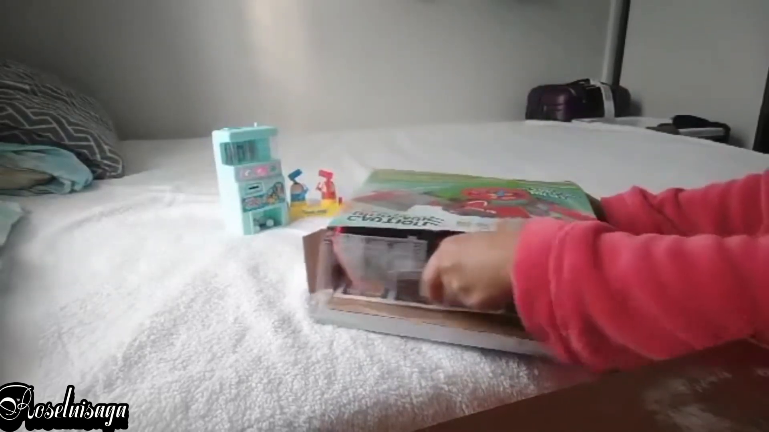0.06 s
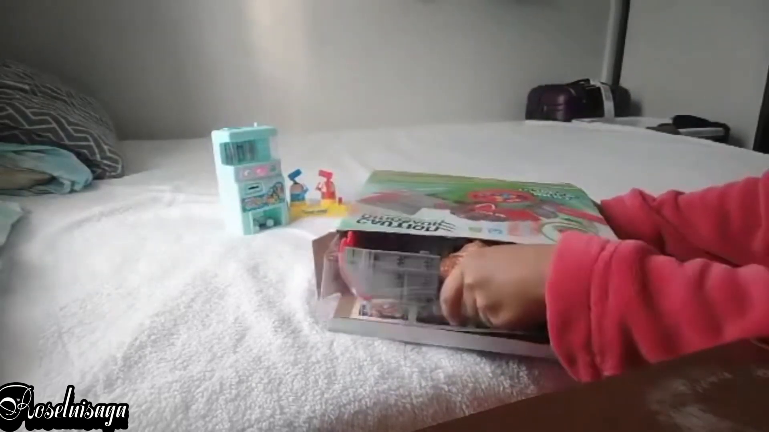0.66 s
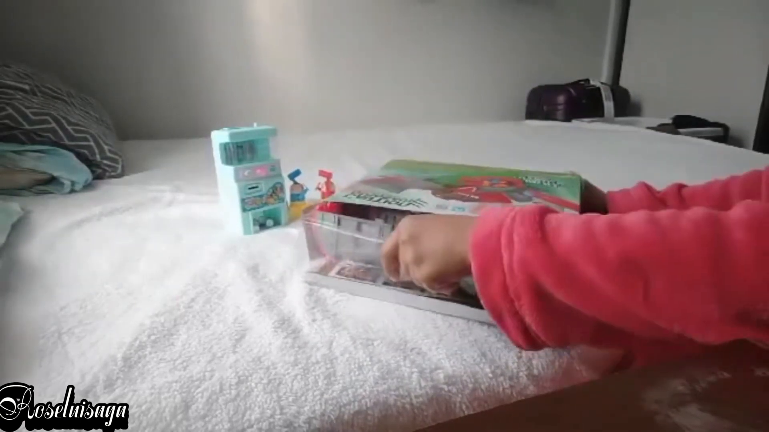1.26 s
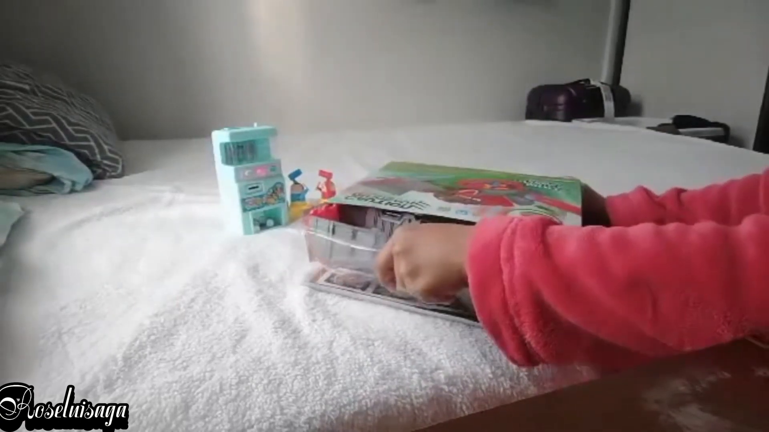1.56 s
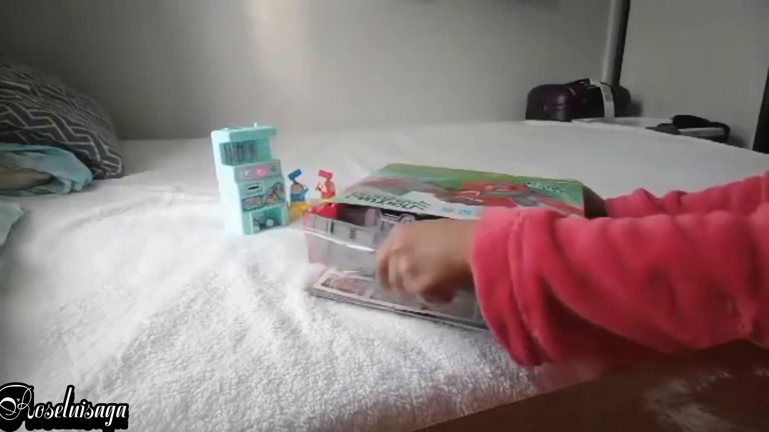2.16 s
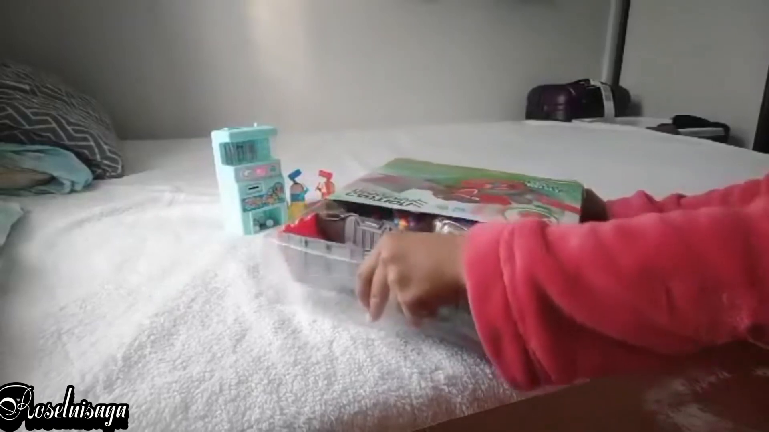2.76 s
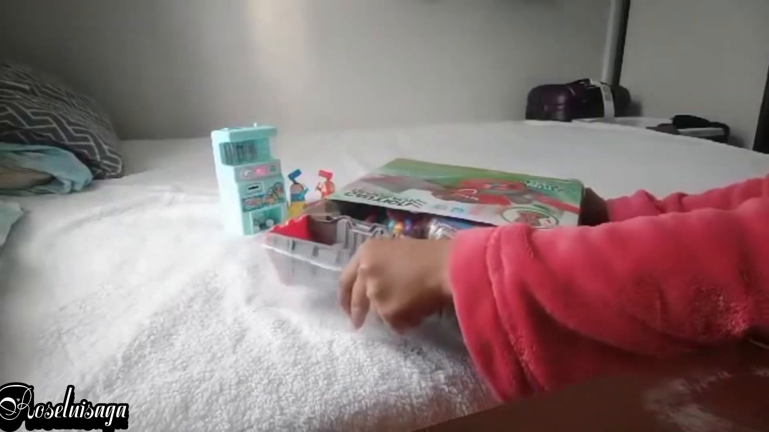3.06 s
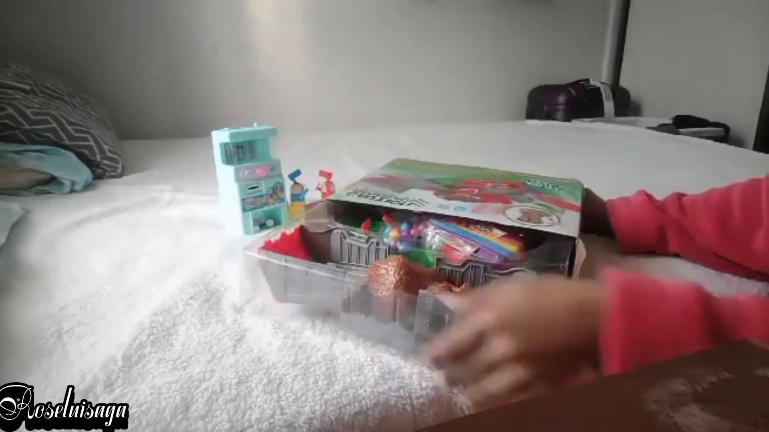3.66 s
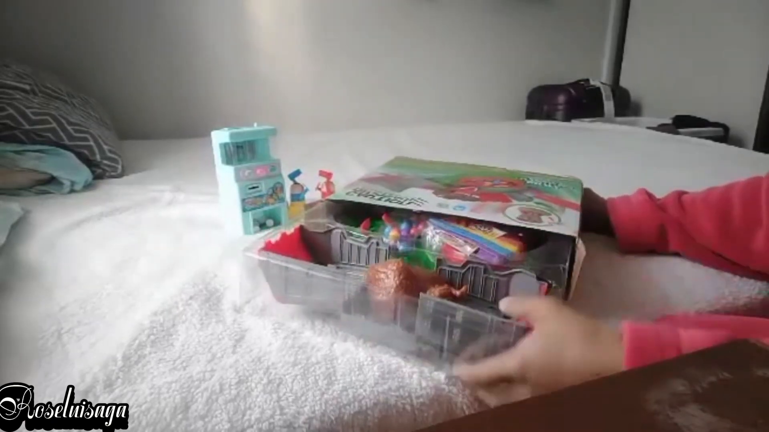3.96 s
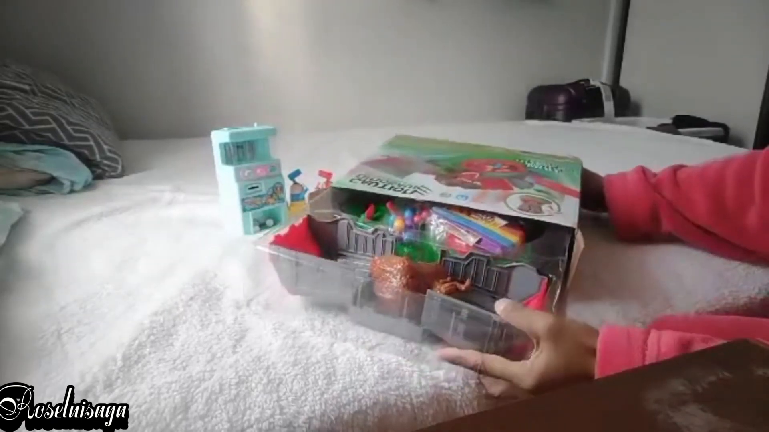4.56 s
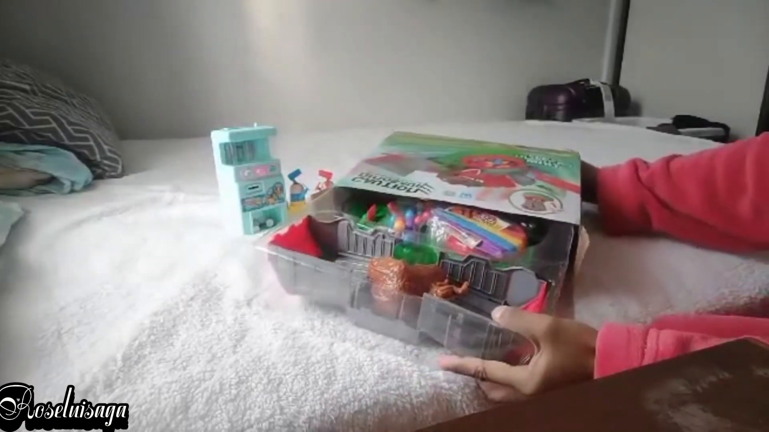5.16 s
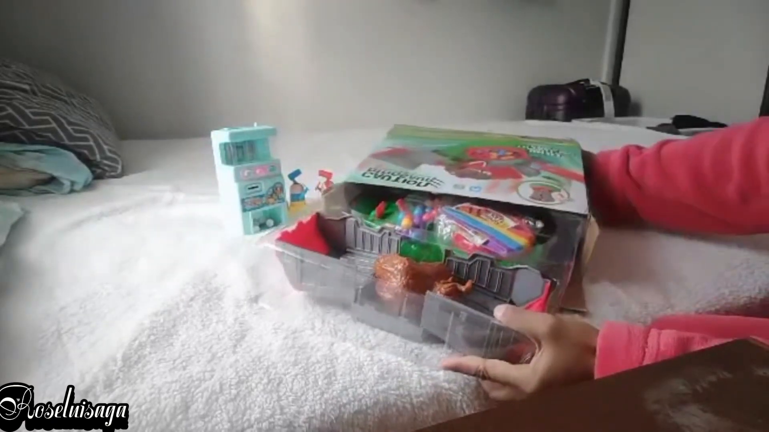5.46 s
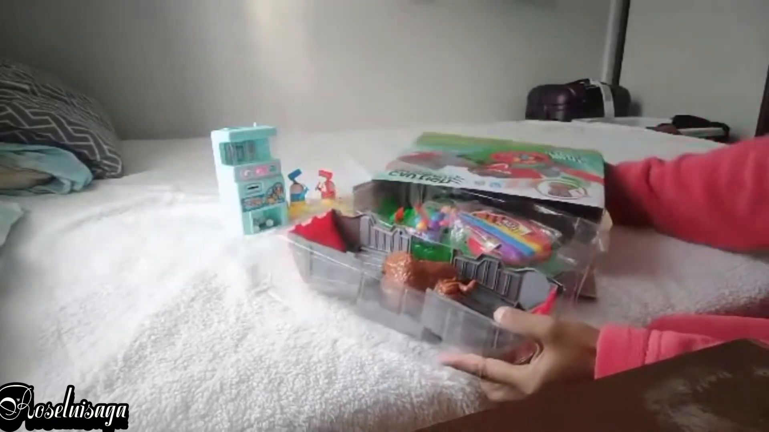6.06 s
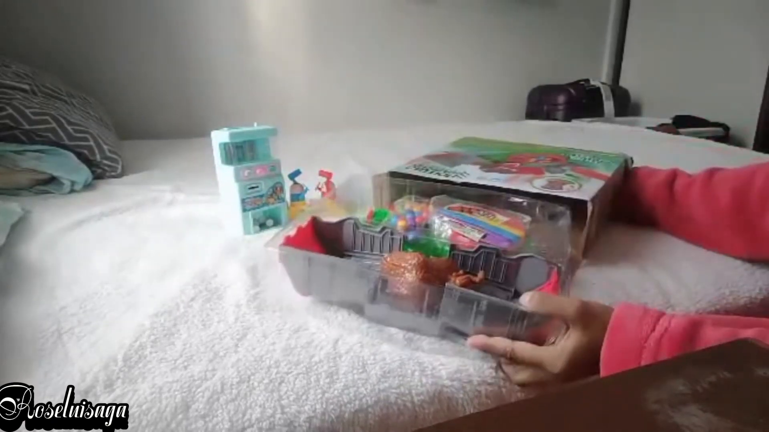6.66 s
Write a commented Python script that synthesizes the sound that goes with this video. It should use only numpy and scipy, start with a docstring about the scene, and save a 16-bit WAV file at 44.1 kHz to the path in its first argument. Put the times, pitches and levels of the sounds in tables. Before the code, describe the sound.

A plastic tray of toys scrapes out of a cardboard box, with thin plastic snapping, crackling and knocking in a small room.

```python
"""A crisp snap of thin plastic, then scraping: a tray of small toys is tugged out of a cardboard box.
The box lies on a bed in a small furnished room, close to a stereo pair of microphones.
The tray sticks and slips in short strokes, its walls buckle, flaps knock and the box bumps the mattress.
Each contact sounds in three registers: the hollow of the box, its panels and the crisp plastic edges."""
import sys
import numpy as np
from scipy import signal
from scipy.fft import rfft, irfft
from scipy.io import wavfile
from scipy.ndimage import uniform_filter1d

SR = 44100
rng = np.random.default_rng(int(sys.argv[2]) if len(sys.argv) > 2 else 0)


def wrap_up_sound(samples):
    """Save the sound to the file named by the first command line argument, as 16-bit audio."""
    columns = np.atleast_2d(samples).T
    # keep every value between -1 and 1, then stretch to whole-number steps
    tamed = np.clip(columns, -1, 1)
    steps = np.round(tamed * 32767).astype(np.int16)
    wavfile.write(sys.argv[1], SR, steps)


N = 304290
TAPS = 2048  # samples in the sound of one contact
FREQS = np.fft.rfftfreq(TAPS, 1 / SR)
PLAIN_WALL_HZ = 3200  # a wall of this pitch ticks neither bright nor dull

# tone colour of the box's hollow, its panels and the plastic edges: frequency_hz, level_db
HOLLOW_COLOUR = [(20, -31.5), (55, -18.5), (85, -16.5), (125, -9), (175, -1), (230, 4), (320, 2.5),
                 (450, -0.5), (620, -15), (1500, -47.5)]
PANEL_COLOUR = [(120, -35.5), (300, -26.5), (480, -0.5), (800, 3.5), (1100, 2), (1500, -4.5), (2200, -4),
                (4000, -10), (9000, -75.5)]
EDGE_COLOUR = [(500, -54), (1100, 2.5), (1700, 2), (2400, 1.5), (3300, 1.5), (4200, -2), (5000, -3),
               (6200, -2.5), (7200, -8.5), (7700, -18.5), (8300, -25.5), (10000, -18), (11500, -26),
               (12700, -31.5), (13500, -46.5)]


def amp(db):
    """Decibels to gain."""
    return 10 ** (np.asarray(db) / 20)


def curve_at(points, hz):
    """Reads a table on a log-frequency axis."""
    f, value = np.transpose(points)
    return np.interp(np.log(hz + 1), np.log(f + 1), value)


def unit(x):
    """Scales a sound to a mean energy of 1 per channel."""
    return x / np.sqrt(np.mean(np.sum(x ** 2, axis=-1)) + 1e-20)


def add(mix, start_s, sound):
    """Mixes a stereo sound in at start_s."""
    part = mix[:, max(round(start_s * SR), 0):][:, :sound.shape[1]]
    part += sound[:, :part.shape[1]]


def lumps(length, size):
    """Random swells of unit spread, each about size samples long."""
    x = uniform_filter1d(uniform_filter1d(rng.standard_normal(length), size), size)
    return x / x.std()


def resonance(hz, width_hz):
    """Shape of one resonance, 1 at its centre."""
    return 1 / (1 + (2 * (FREQS - hz) / width_hz) ** 2)


def minimum_phase(db):
    """The shortest impulse response with this spectrum."""
    log_gain = np.log(amp(np.maximum(db, db.max() - 80)))
    mirrored = np.r_[log_gain, log_gain[-2:0:-1]]
    return np.fft.ifft(np.exp(np.conj(signal.hilbert(mirrored)))).real


def pair_noise(length):
    """Noise as two closely spaced microphones hear it: alike in the bass, unrelated in the treble."""
    # likeness of the two microphones: frequency_hz, correlation
    likeness = [(100, 0.77), (300, 1), (600, 0.85), (1300, 0.54), (2800, 0.032), (13000, 0)]
    a, b = rfft(rng.standard_normal((2, length)))
    same = np.clip(curve_at(likeness, np.fft.rfftfreq(length, 1 / SR)), -1, 1)
    return irfft([a, same * a + np.sqrt(1 - same ** 2) * b], length)


def left_lag(time_s):
    """Whole samples by which the left microphone hears the contact later."""
    # path of the contact in front of the pair: time_s, lag_samples
    path = [(0, -0.5), (3.3, -5.5), (3.7, 3.5), (4.7, 5), (6.2, 5.5), (6.9, 2.5)]
    return np.round(np.interp(time_s, *np.transpose(path))).astype(int)


def contact(register, ring_hz, ring_db, ring_width_hz, flutter_s, flutter_db,
            tilt_db=0, ripple_db=2.5, rise_s=.0002, fizz_db=0, evenness=0):
    """A sharp push, then a crackling flutter of the sheet, coloured by the box and the part that rings."""
    # resonances of the box: pitch_hz, width_hz, lift_db
    box_modes = [(120, 34, -3), (215, 34, 2), (354.6, 45, 7), (453, 29, 2), (570, 27, 2), (926, 13, 2),
                 (1040, 17, 0), (1326, 26, 1)]
    t = np.arange(TAPS) / SR
    flutter = (1 - np.exp(-t / rise_s)) * np.exp(-(t / flutter_s) ** 0.95)
    flutter *= amp(1.5 * lumps(TAPS, size=50))  # crackle
    blow = amp(flutter_db) * unit(pair_noise(TAPS) * flutter)
    blow[:, 0] += 1  # the push
    colour_db = curve_at(register, FREQS) + sum(db * resonance(hz, width) for hz, width, db in box_modes)
    colour_db += tilt_db * np.log2(FREQS.clip(1500, 8000))  # a harder, shorter blow is brighter
    colour_db += fizz_db * np.clip(FREQS / 10160 - 1, 0, .5) * 2  # top octave only
    drive = uniform_filter1d((abs(rfft(blow)) ** 2).mean(0), size=27)
    colour_db -= evenness * 10 * np.log10(drive + 1e-9)  # an even blow leaves the colour to the modes
    walls_hz = np.linspace(1200, 13500, 22)  # each spot favours other wall modes
    colour_db += np.interp(FREQS, walls_hz, ripple_db * rng.standard_normal(len(walls_hz)), left=0)
    modes = resonance(ring_hz, ring_width_hz) + .3 * resonance(1.3 * ring_hz, ring_width_hz)
    body = minimum_phase(colour_db + ring_db * modes)
    return unit(irfft(rfft(blow, 2 * TAPS) * rfft(body, 2 * TAPS)))


def strike(start_s, hollow_db, panels_db, edges_db, ring_hz, ring_db, tilt_db, flap_hz, crumple_s, rise_s):
    """One blow in all three registers: a flap and a wall ring, and heavier parts shake for longer."""
    blow = dict(tilt_db=tilt_db, ripple_db=1.0, rise_s=rise_s, evenness=0.71)
    flap = dict(ring_hz=flap_hz, ring_db=8, ring_width_hz=180, **blow)
    wall = dict(ring_hz=ring_hz, ring_db=ring_db, ring_width_hz=.27 * ring_hz, **blow)  # well damped
    crack_db = 2 / (1 + crumple_s / 0.004)  # a clean click has the most fizz
    hollow = amp(hollow_db) * contact(HOLLOW_COLOUR, flutter_s=crumple_s + 0.0045, flutter_db=1.5, **flap)
    panels = amp(panels_db) * contact(PANEL_COLOUR, flutter_s=crumple_s + 0.0031, flutter_db=15, **flap)
    edges = amp(edges_db) * contact(EDGE_COLOUR, flutter_s=crumple_s, flutter_db=7, fizz_db=crack_db, **wall)
    left, right = np.sqrt(SR / 100) * (hollow + panels + edges)  # levels hold for energy spread over 10 ms
    lag = left_lag(start_s)
    return np.array([np.roll(left, max(lag, 0)), np.roll(right, max(-lag, 0))])


def plastic_pops(rows):
    """Stiff plastic gives way fast and shakes the box: a short crumple clicks, a long one crunches."""
    out = np.zeros((2, N))
    for start_s, edges_db, box_db, ring_hz, ring_db, tilt_db, flap_hz, crumple_s in rows:
        panels_db = edges_db + box_db
        add(out, start_s, strike(start_s, panels_db - 9, panels_db, edges_db,
                                 ring_hz, ring_db, tilt_db, flap_hz, crumple_s, rise_s=0.0005))
    return out


def wall_snaps():
    """The thin walls of the tray buckle and snap."""
    # buckling walls, box_db relative to level_db:
    # start_s, level_db, box_db, ring_hz, ring_db, tilt_db_per_octave, flap_hz, crumple_s
    buckles = [(.002, -29.5, 1, 5900, -2, 7, 1030, 0.014), (.016, -33.5, -5, 4850, -8, -1, 1030, 0.0061),
               (.0567, -38, -6, 3560, 7, -7, 830, .002), (.2234, -46.5, 4.5, 3430, 14, 1, 910, .0027),
               (.336, -30, -2, 4000, 16, 0.5, 790, .0066), (.4014, -30, -4, 5170, 0.5, .5, 1430, 0.014),
               (.5253, -49, -3, 3400, 1, 0, 890, .002), (.6295, -27, -0.5, 1830, 9, -2.5, 1540, .0068),
               (.7866, -26.5, -5, 2870, 6, -3, 694, 0.0096), (.874, -37.5, 1.5, 3330, -4, 6, 840, .0034),
               (.9205, -30, -4.5, 6000, 3, 0.5, 734, 0.0094), (.9403, -31, -5, 4680, -3, 1.5, 1280, 0.0058),
               (.9605, -27.5, -9, 3400, 2.5, 2, 850, 0.011), (.976, -38, 0, 4600, 6, -2, 900, .0027),
               (1.0253, -31, -5, 3780, -4, 2.5, 1060, .004),
               (1.1886, -28.5, -3, 3570, 2, -3.5, 1030, 0.006), (1.2411, -40, -10, 3440, 4, 4, 900, 0.0018),
               (1.511, -39, 2, 5500, -8, 5, 900, .003), (1.626, -22, -5, 3740, 0, -1, 1060, .013),
               (1.645, -29.5, -7, 3230, -7, -2.5, 850, 0.007),
               (1.663, -30, -4, 5700, -1, 5.5, 1050, 0.0038), (1.7156, -38, -11, 3300, -9, 2, 900, 0.0039),
               (1.7353, -30.5, -6.5, 1600, 12, -9, 1500, 0.0031),
               (1.8202, -37, 0, 4400, 6, -0.5, 1040, 0.001), (1.85, -27, -6.5, 4000, 6, 0, 1030, 0.004),
               (1.983, -35.5, 4.5, 3300, 5, -4, 1050, 0.017), (2.0105, -24.5, -11, 2620, 8, -2, 1030, 0.02),
               (2.075, -40, 5, 3750, 1, -7, 960, .009), (2.21, -42, -8, 3200, -5, 4, 900, .005),
               (2.229, -31, -9, 2580, 1, -1, 1030, 0.0079), (2.3537, -37, -14, 3000, 7, -3, 900, 0.0036),
               (2.4005, -23, -3.5, 4750, 2, -2, 915, 0.0029), (2.438, -25, -4, 3380, 5, 4.5, 810, 0.013),
               (2.513, -25, -2.5, 3070, 6, -7.5, 1160, 0.0068), (2.5507, -25, -11, 3250, 0, 2.5, 740, .02),
               (2.64, -37, -16, 3700, -1, -0.5, 900, 0.0015),
               (2.707, -38.5, -1.5, 2850, 2, -5.5, 1370, .001), (2.7453, -41.5, -5, 4200, 3, -2, 900, .004),
               (2.768, -35, -12, 1980, 12, 1, 1010, 0.0024),
               (2.8585, -32, -1.5, 3300, -4, -3.5, 1130, .0025),
               (3.0578, -48.5, -2.5, 3020, 4, -1.5, 900, 0.004),
               (3.1105, -45.5, -11.5, 3080, 11, 3, 900, 0.00066),
               (3.1478, -36.5, -17, 5700, 5, 3, 980, 0.0021), (3.179, -31.5, -16, 5760, 2, 1, 1200, .003),
               (3.2101, -29, -8, 2340, 4, -3, 1010, 0.0036),
               (3.229, -29.5, -2.5, 3090, 10, -3, 714, 0.0029),
               (3.2626, -32, 0.5, 2600, 0, -3, 1010, 0.0013),
               (3.3113, -32.5, -27, 3860, 11, 6, 925, 0.0037),
               (3.3225, -35, -12, 5380, 2.5, 7, 1100, 0.0039),
               (3.645, -31.5, -5.5, 2540, 10, 0, 1215, 0.0014),
               (3.8181, -43.5, -3.5, 3680, 11, 6, 670, .0013), (3.8685, -45, -13, 4500, 5, 3, 900, .0018),
               (3.877, -29, -16, 3160, 10, 3, 1500, 0.0023), (3.901, -39.5, -21, 4630, 16, 0, 900, 0.0068),
               (4.2573, -51, -13, 5570, -6, 9, 900, 0.0016), (4.269, -55, -16, 6500, 6, 9, 900, .002),
               (4.297, -37, -3, 3180, 11.5, -2, 1150, 0.0015), (4.4694, -43, -1.5, 3710, 7, 0, 725, 0.0035),
               (4.6888, -51, -1, 3500, 11, 1, 900, .003), (4.7276, -38.5, -1, 4270, 11, -2, 805, .0017),
               (4.778, -43, 4, 3350, 2, 4.5, 810, 0.0019), (4.9039, -41.5, -6.5, 3930, 2, -2, 700, 0.0041),
               (4.9843, -37.5, -2.5, 3140, 12, -3.5, 1010, .003),
               (5.0104, -24.5, -0.5, 4060, 7, 2, 890, .003), (5.138, -40.5, -1, 3740, 5, -2, 1160, 0.0018),
               (5.3319, -39.5, -3, 3400, 8, -5, 900, .003),
               (5.424, -33.5, -0.5, 5270, 11, 5.5, 660, 0.0029),
               (5.431, -34.5, -15, 3330, 4, 3, 900, .0034), (5.5115, -45, -3, 3500, -2, 7, 900, .003),
               (5.5484, -40, -6, 3550, 18, 2, 730, .002), (5.5886, -23, -10, 3800, 10, -0.5, 850, 0.0026),
               (5.8131, -36.5, -9, 2190, 11, -2.5, 1260, .0013), (5.8525, -38, -9, 5290, 4, 5, 830, .003),
               (5.923, -33.5, -8, 3860, 8, 1, 1210, .0029), (6.1166, -32.5, -4, 3860, 11, 1, 1150, 0.0037),
               (6.2089, -45, 1, 3300, 2, -1, 900, .003), (6.2878, -29.5, -10.5, 4950, 3, 1, 1195, .0042),
               (6.371, -41.5, -18, 2860, 2, -1, 900, 0.0078),
               (6.4784, -43, -13.5, 5660, 11.5, 6, 944, 0.0011),
               (6.757, -70.5, -10.5, 6600, 7.5, 7.5, 907, 0.0033)]
    return plastic_pops(buckles)


def stroke_levels(grip_db_per_s=413, run_out_db_per_s=313.5, arch_db=1.5):
    """Hollow, panel and edge levels in dB: strokes gather speed, arch and run out; the strongest leads."""
    # pulls and pushes of the tray, hollow_db and edges_db relative to the panels' level_db:
    # start_s, length_s, level_db, swell_db, hollow_db, edges_db
    strokes = [(0.04, 0.087, -41.5, -4, -5.5, -5), (0.16, 0.058, -54.5, 7, -3, -1),
               (0.223, 0.074, -41.5, 5, 0.5, -10), (0.304, 0.045, -32.5, -9, 1.5, -1),
               (0.348, 0.053, -38, -3, -5, -5), (0.512, 0.17, -39.5, 0.5, -6, -7.5),
               (0.789, 0.027, -29.5, -0.5, -14.5, 2.5), (0.929, 0.14, -41, -5, -10.5, -0.5),
               (1.057, 0.23, -44, 7, -5.5, -18), (1.197, 0.098, -37, 10.5, -4, 3.5),
               (1.38, 0.083, -52, -3, -5, -3.5), (1.495, 0.045, -34.5, 9.5, -1, 3),
               (1.62, 0.18, -41, -7, -3, 5.5), (1.761, 0.36, -36.5, 6, -5.5, -9.5),
               (1.992, 0.11, -34.5, 0.5, -8, 2), (2.202, 0.091, -33.5, -3, -5, -7.5),
               (2.36, 0.06, -33, 0.5, -3, 1.5), (2.432, 0.14, -30.5, -2, -6, 0.5),
               (2.589, 0.054, -44, 4, -7, 4), (2.687, 0.03, -44.5, 0, -1.5, 0),
               (2.754, 0.073, -39, -2.5, -4.5, -0.5), (2.858, 0.11, -41, -3.5, -4.5, -1.5),
               (3.098, 0.042, -43.5, -3, -6.5, -6.5), (3.171, 0.046, -35, 0.5, -6, 4.5),
               (3.493, 0.11, -81, -0.5, 1.5, 6), (3.598, 0.031, -58, 0, -2, -5),
               (3.727, 0.098, -53.5, 4, -3.5, 2), (3.893, 0.021, -47.5, 0, -8, -2),
               (3.988, 0.094, -49.5, -13, -2.5, 2), (4.099, 0.047, -52.5, 0, -3, 1),
               (4.175, 0.26, -55.5, -6.5, -9, -4.5), (4.3, 0.33, -53, -1, 0, -1.5),
               (4.487, 0.066, -46, 9.5, -2.5, -3), (4.693, 0.33, -57.5, -11, -2, -7),
               (4.884, 0.16, -51, 11, 2, -2), (5.01, 0.084, -43.5, 3.5, -1.5, -0.5),
               (5.295, 0.1, -40.5, 7, -4, 0.5), (5.474, 0.06, -45, 5, -4.5, 0.5),
               (5.645, 0.19, -48.5, -4.5, -4.5, -11), (5.831, 0.015, -38, -3.5, -3, -3),
               (5.87, 0.21, -45, -4.5, -7, -5), (6.056, 0.22, -46.5, -1, -2.5, 2),
               (6.284, 0.24, -54, -6.5, -3, -4.5), (6.599, 0.028, -65, -2, -4.5, -2.5),
               (6.708, 0.02, -74, -2, -2.5, -8.5), (6.757, 0.14, -73.5, 2, -1.5, -16)]
    t = np.arange(0, N / SR, .002)
    levels = []
    for start_s, length_s, level_db, swell_db, hollow_db, edges_db in strokes:
        along = np.clip((t - start_s) / length_s, 0, 1) - .5
        db = level_db + swell_db * along - arch_db * (2 * along) ** 2
        db -= grip_db_per_s * np.maximum(start_s - t, 0)
        db -= run_out_db_per_s * np.maximum(t - start_s - length_s, 0)
        levels.append([db + hollow_db, db, db + edges_db])
    return [np.interp(np.arange(N) / SR, t, db) for db in np.max(levels, axis=0)]


def scrape(slips, level_db, register, ring_range_hz, ring_db, flutter_s, spot_samples=1800):
    """The slips travel over ever new contact spots, each with its own ring and hardness."""
    force = slips / np.sqrt(uniform_filter1d(slips ** 2, size=1100).clip(1e-9)) * amp(level_db)
    spot = (np.arange(N) / spot_samples + rng.random(N)).astype(int)  # one spot hands over to the next
    low_hz, high_hz = ring_range_hz
    treble_pivot_db = -44.5  # the top octave fades in quiet scraping and opens in loud scraping
    out = np.zeros((2, N))
    for k in range(N // spot_samples + 1):
        span = slice(max(k - 1, 0) * spot_samples, (k + 1) * spot_samples)
        hz = low_hz * (high_hz / low_hz) ** rng.random()
        ring = contact(register, hz, ring_db, ring_width_hz=0.5 * hz, flutter_s=flutter_s, flutter_db=-0.5,
                       tilt_db=2.6 * rng.standard_normal(),
                       fizz_db=1.04 * (level_db[k * spot_samples] - treble_pivot_db))
        spot_force = force[span] * (spot[span] == k)
        add(out, span.start / SR, signal.fftconvolve(spot_force[None], ring, axes=1))
    return out


def sliding(hollow_db, panels_db, edges_db, slips_per_s=1100, spread_db=3.0, clump_db=1.5):
    """Plastic sticks and slips on cardboard: tiny releases come in clumps, a few much larger."""
    size = amp(spread_db * np.minimum(rng.exponential(1, N), 5) + clump_db * lumps(N, size=160))
    slips = size * rng.choice([-1, 1], N) * (rng.random(N) < slips_per_s / SR)
    hollow = scrape(slips, hollow_db, HOLLOW_COLOUR, (130, 400), ring_db=3.5, flutter_s=0.0027)
    panels = scrape(slips, panels_db, PANEL_COLOUR, (550, 1500), ring_db=4.5, flutter_s=0.0014)
    edges = scrape(slips, edges_db, EDGE_COLOUR, (1700, 6500), ring_db=6.0, flutter_s=0.0028)
    left, right = hollow + panels + edges
    now = np.arange(N)
    delayed = np.clip(now - left_lag(now / SR), 0, N - 1)
    return np.array([left[delayed], right])


def crease_ticks(edges_db, ticks_per_s=14, low_hz=2200, high_hz=6500,
                 box_db=-6, ring_db=7, flap_hz=940, crumple_s=0.001):
    """Small creases give way at random, their level following the sliding edges."""
    onsets = np.flatnonzero(rng.random(N) < ticks_per_s / SR)
    rows = []
    for i, (strength, wall) in zip(onsets, rng.random((len(onsets), 2))):
        ring_hz = low_hz * (high_hz / low_hz) ** wall
        level_db = edges_db[i] - 8.5 + 2 * (2 * strength - 1)
        tilt_db = 7 * np.log2(ring_hz / PLAIN_WALL_HZ)  # a smaller, higher wall snaps more sharply
        rows.append((i / SR, level_db, box_db, ring_hz, ring_db, tilt_db, flap_hz, crumple_s))
    return plastic_pops(rows)


def flap_knocks():
    """The tray catches on the cardboard flaps: dull blows in which the plastic wall does not ring."""
    # blows on the flaps, hollow_db and edges_db relative to the panels' level_db:
    # start_s, level_db, hollow_db, edges_db, flap_hz, crumple_s
    catches = [(.2475, -34, -3, -5.5, 830, 0.0037), (.2819, -29.5, -8, 1, 1090, 0.0081),
               (.5738, -42, -6, 1.5, 915, 0.0029), (.6234, -39, -8, -7, 625, 0.0034),
               (.683, -34, -9, -5.5, 930, 0.0041), (.7402, -48, 5, 3, 900, 0.0058),
               (1.1236, -38.5, -12, -8.5, 935, 0.011), (1.298, -29, -1.5, -5, 775, .017),
               (1.641, -25, 0.5, -0.5, 665, 0.0023), (1.9398, -34.5, -4, -20, 760, .0015),
               (2.0085, -21, -11, -8, 1040, 0.0028), (2.3241, -32.5, -9, -9, 1030, .0049),
               (2.375, -32, 3.5, -2, 1055, .01), (2.47, -27, 1, -20, 745, .011),
               (3.701, -41.5, -7, -5, 695, 0.0071), (3.767, -40.5, 1.5, -14, 890, .005),
               (3.922, -37.5, -10, -26, 800, .0013), (3.978, -35.5, -5, -5.5, 730, .012),
               (3.989, -37.5, -14, -4, 1140, 0.0014), (4.1261, -44.5, -3.5, -1, 860, 0.01),
               (4.602, -45, -9, -2.5, 615, .0052), (5.2544, -50.5, -6, -2, 910, .0016),
               (5.547, -34.5, -1, -4, 730, 0.0044), (5.9556, -41, -3, 3.5, 730, .002),
               (6.101, -31, -4.5, -5, 1180, 0.0079), (6.168, -34.5, -2, -6, 925, .0075)]
    out = np.zeros((2, N))
    for start_s, level_db, hollow_db, edges_db, flap_hz, crumple_s in catches:
        knock = strike(start_s, level_db + hollow_db, level_db, level_db + edges_db, PLAIN_WALL_HZ,
                       ring_db=0, tilt_db=-1.5, flap_hz=flap_hz, crumple_s=crumple_s, rise_s=0.0014)
        add(out, start_s, knock)
    return out


def mattress_thumps(swell_s=0.02):
    """The whole box settles on soft bedding: a few low cycles that swell and die."""
    # bumps on the mattress: start_s, level_db, pitch_hz
    bumps = [(.285, -46, 58), (0.288, -35, 155), (1.242, -48.5, 111), (1.64, -50, 109), (2.012, -49, 111),
             (2.079, -47, 113), (2.384, -42, 119), (2.452, -35.5, 117.4), (4.741, -48, 184),
             (5.34, -51, 169), (5.425, -61, 62), (5.869, -54, 163), (6.17, -52.5, 122)]
    out, t = np.zeros((2, N)), np.arange(SR // 4) / SR
    swell = (t / swell_s * np.exp(1 - t / swell_s)) ** 2
    for start_s, level_db, pitch_hz in bumps:
        thump = amp(level_db) * swell * np.sin(2 * np.pi * pitch_hz * t)
        add(out, start_s, np.array([thump, thump]))
    return out


def room_echo(x, nearest_wall_s=0.0056):
    """A small furnished room: dense echoes return from the nearest wall on, and die fastest at the top."""
    # decay of the room: frequency_hz, t60_s
    decay = [(100, 0.19), (400, 0.22), (1000, 0.16), (3000, 0.18), (7000, 0.22), (13000, 0.12)]
    length = SR // 2
    hz, t, spectra = signal.stft(pair_noise(length), SR, nperseg=256)
    fade = amp(-60 * t / curve_at(decay, hz)[:, None])
    tail = signal.istft(spectra * fade, SR, nperseg=256)[1][:, :length]
    tail *= np.minimum(np.arange(length) / SR / nearest_wall_s, 1) ** 4
    return signal.oaconvolve(x, unit(tail), axes=1)[:, :N]


def even_echo(x, count=5, cycle_hz=2.3):
    """Several echo patterns take turns, so the room sounds even and no single pitch rings out."""
    turn = 2 * np.pi * np.arange(N) / SR * cycle_hz
    shares = np.array([np.maximum(np.cos(turn + 2 * np.pi * k / count), 0) ** 2 for k in range(count)])
    return sum(room_echo(x * share) for share in shares / np.linalg.norm(shares, axis=0))


def room_tone(level_db=-75.5):
    """Faint steady noise of the room."""
    # colour of the quiet room: frequency_hz, relative_db
    colour = [(30, -22.5), (110, -11.5), (155, -6), (220, -8.5), (820, -9), (930, -0.5), (1100, -11.5),
              (2000, -24.5), (6000, -24.5), (8000, -33.5), (13000, -37)]
    gain = amp(curve_at(colour, np.fft.rfftfreq(N, 1 / SR)))
    noise = irfft(rfft(pair_noise(N)) * gain, N)
    return amp(level_db) * np.sqrt(N) * unit(noise)


def scene():
    """Snaps, scrapes, knocks and bumps near the pair, a little right of centre, with the room behind."""
    hollow_db, panels_db, edges_db = stroke_levels()
    rub = sliding(hollow_db, panels_db, edges_db)
    knocks = flap_knocks()
    snaps = wall_snaps() + crease_ticks(edges_db)
    direct = amp(-0.5) * rub + amp(-1) * (snaps + knocks)
    echo = even_echo(amp(-7) * rub + amp(-5) * snaps + amp(-9) * knocks)
    balance = amp([[-.9], [.7]])
    return (direct + echo + mattress_thumps()) * balance + room_tone()


def record(dry):
    """The recorder cuts off steeply at 13.5 kHz."""
    lowpass = signal.firwin(401, 13500, window=("kaiser", 8), fs=SR)
    return signal.oaconvolve(dry, lowpass[None], "same", axes=1)


dry = scene()
out = record(dry)
wrap_up_sound(out)
```